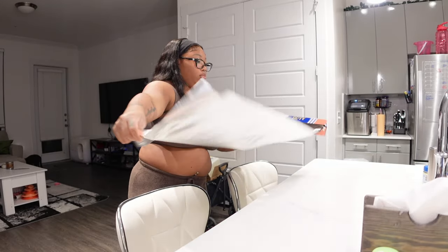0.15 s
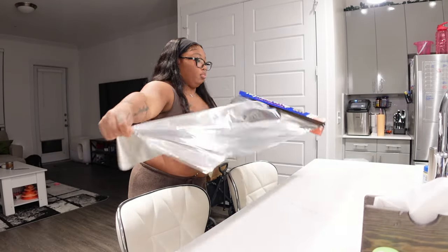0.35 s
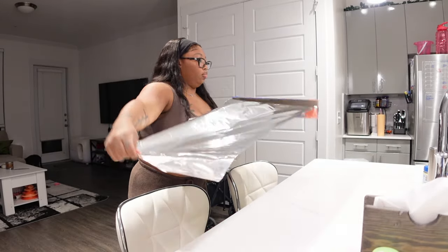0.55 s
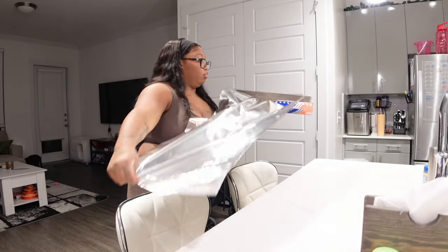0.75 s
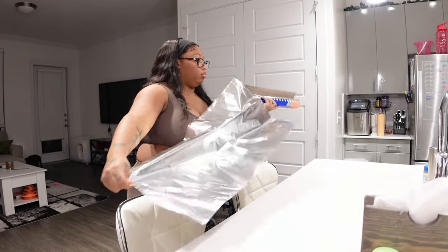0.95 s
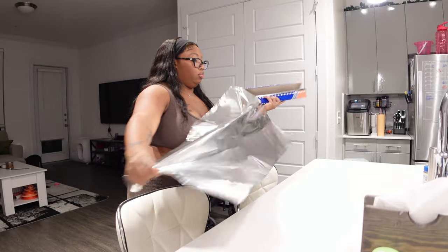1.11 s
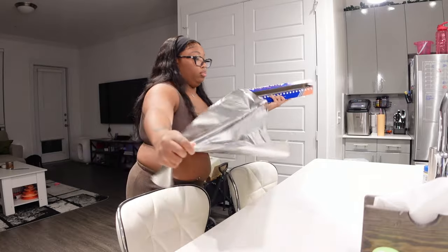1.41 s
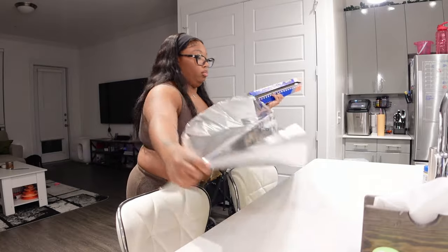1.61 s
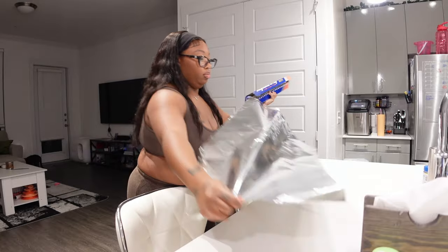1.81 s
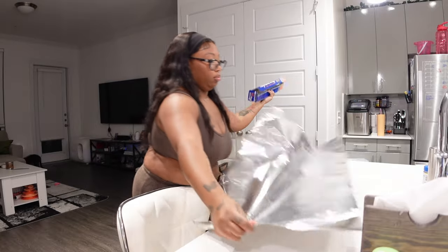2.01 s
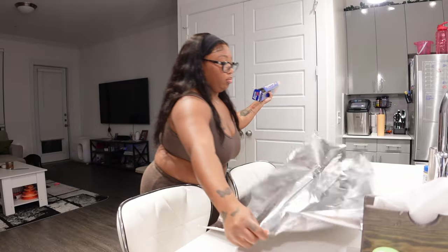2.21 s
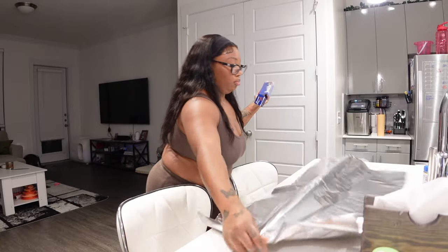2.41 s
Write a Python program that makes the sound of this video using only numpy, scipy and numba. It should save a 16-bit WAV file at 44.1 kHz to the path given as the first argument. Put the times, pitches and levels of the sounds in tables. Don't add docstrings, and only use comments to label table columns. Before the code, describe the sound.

Bright metallic foil crinkling comes in bursts, loudest in the middle, with duller rustling and short sliding wobbles, then thins to small snaps. Reverberant hard-walled kitchen, low air rumble and hum, compressed small camera microphone.

```python
import sys
import numpy as np
from scipy import signal
from scipy.fft import rfft, irfft
from scipy.io import wavfile
from scipy.ndimage import uniform_filter1d, map_coordinates
from numba import njit

SR = 44100
rng = np.random.default_rng(int(sys.argv[2]) if len(sys.argv) > 2 else 0)


def materialize(psi):
    bounded = np.clip(np.atleast_2d(psi).T, -1, 1)
    quanta = np.round(bounded * 32767).astype(np.int16)
    wavfile.write(sys.argv[1], SR, quanta)


def attenuation_scalar(level_db):
    decades = np.asarray(level_db, float) / 20
    return 10 ** decades


N = 112454


def level(x, db):
    return x * attenuation_scalar(db) / np.sqrt(np.mean(x ** 2))


def colour_db(hz, table):
    table_hz, table_db = np.array(table).T
    return np.interp(np.log(hz), np.log(table_hz), table_db)


def fridge_hum(t):
    # f/Hz, level/dB
    hum = [(27.5, -57.5), (139, -62)]
    return sum(attenuation_scalar(db) * np.sqrt(2) * np.sin(2 * np.pi * hz * t) for hz, db in hum)


def room_air(t):
    # f/Hz, level per Hz/dB
    air_spectrum = [(8, -8), (20, 5), (35, -4), (70, -14), (150, -9), (400, -30), (2000, -19.5)]
    draught_s, draught_db, rise_s, settle_s = 1.1, 7, 0.03, 0.93
    hz = np.fft.rfftfreq(N, 1 / SR) + 1
    air = rfft(rng.standard_normal(N)) * attenuation_scalar(colour_db(hz, air_spectrum)) * (hz > 8)
    since = t - draught_s
    stir = attenuation_scalar(draught_db * np.clip(since / rise_s, 0, 1) * np.exp(-np.clip(since, 0, 9) / settle_s))
    draught = irfft(air * (hz < 40), N) * stir
    rumble = irfft(air * (hz >= 40), N)
    return level(draught + rumble, -42)


def echoes():
    # f/Hz, T60/s
    room_t60 = [(200, .4), (2000, 1), (6000, 1), (14000, 0.48)]
    first_echo_s = 0.004
    t = np.arange(SR // 2) / SR
    hz = np.fft.rfftfreq(len(t), 1 / SR) + 1
    tail = 0
    for centre in 125 * 2. ** np.arange(8):
        share = np.clip(1 - abs(np.log2(hz / centre)), 0, 1) ** .5
        band = irfft(rfft(rng.standard_normal(len(t))) * share, len(t))
        t60 = max(colour_db(centre, room_t60), .05)
        fade = attenuation_scalar(-60 * t / t60) * (t > first_echo_s)
        tail = tail + band * fade / np.sqrt(np.sum(fade ** 2))
    return tail


def kitchen_echo(x, count=30):
    place = np.arange(N) / N * (count - 1)
    wet = np.zeros(N)
    for k in range(count):
        moment = x * np.clip(1 - abs(place - k), 0, 1) ** .5
        wet += signal.fftconvolve(moment, echoes())[:N]
    return wet


@njit
def ring(start, hz, cycles, size, n, sr):
    out = np.zeros(n)
    for k in range(len(start)):
        length = cycles[k] * sr / hz[k]
        phasor = size[k] + 0j
        turn = np.exp(2j * np.pi * hz[k] / sr - 4 / length)
        rest, rest_decay = 1., np.exp(-20 / length)
        for i in range(start[k], min(n, start[k] + int(length) + 1)):
            out[i] += phasor.imag * (1 - rest)
            phasor *= turn
            rest *= rest_decay
    return out


def walk(rate):
    hold = int(SR / rate)
    steps = np.repeat(rng.standard_normal(N // hold + 1), hold)
    return 1.2 * uniform_filter1d(steps, hold)[:N]


def creases(envelope, table, count, cycles, spread_db, patchy_db, colour_patchy_db=0.82):
    when, pitch, long, big, way = rng.random((count, 5)).T
    lo, hi = table[0][0], min(table[-1][0], .45 * SR)
    hz = lo + (hi - lo) * pitch ** 2
    turns = cycles * (.5 + 2 * long ** 2)
    size = np.sqrt(hz * pitch / turns)
    size = size * attenuation_scalar(colour_db(hz, table) - spread_db * np.log(1 - big)) * np.sign(way - .5)
    start = (when * N).astype(np.int64)
    patches = np.array([walk(14) for _ in range(8)])
    colour_patch = map_coordinates(patches, [7 * pitch, start], order=1)
    flurry = attenuation_scalar(patchy_db * walk(39.96)[start] + colour_patchy_db * colour_patch)
    rms = np.sqrt(np.sum(size ** 2 * turns * SR / hz) / 25 / N)
    return ring(start, hz, turns, size * envelope[start] * flurry / rms, N, SR)


def rustle(t):
    # t/s, rustle level/dB
    motion = [(0.0, -26), (0.35, -19.5), (0.51, -26.5), (0.69, -16), (1.06, -14), (1.18, -30), (1.4, -26),
              (1.45, -17.5), (1.69, -15.5), (1.79, -27), (1.82, -17), (1.94, -25.5), (1.99, -18.5),
              (2.11, -30), (2.14, -23), (2.23, -27), (2.24, -23), (2.55, -27.5)]
    # f/Hz, level per Hz/dB
    rustle_spectrum = [(150, -35), (400, -44), (1000, -3), (2500, 1), (5000, 1.5), (7000, -11), (9000, -30),
                       (16000, -12)]
    envelope = attenuation_scalar(np.interp(t, *np.array(motion).T) - 1.5)
    return creases(envelope, rustle_spectrum, count=50000, cycles=5.63, spread_db=1.5, patchy_db=1.57)


def wobbles(count=90):
    # t/s, length/s, level/dB, first f/Hz, last f/Hz
    panels = [(0.001, 0.054, -43, 370, 350), (0.34, 0.13, -40, 910, 1090),
              (0.541, 0.064, -27.5, 3540, 3200), (.64, .09, -39, 320, 272), (0.643, 0.056, -32, 1200, 1060),
              (0.652, 0.086, -28, 2600, 2180), (0.683, .13, -24.5, 4120, 4600),
              (0.705, .08, -21, 1980, 1300), (0.788, 0.2, -24, 874, 734), (0.825, 0.19, -23.5, 1560, 1290),
              (.84, 0.13, -27, 430, 403), (0.926, 0.2, -48, 140, 108), (0.941, .14, -30.5, 272, 221),
              (.97, 0.094, -32, 610, 373), (1.429, 0.24, -31.5, 830, 615), (1.458, .24, -33, 400, 299),
              (1.496, .22, -28, 5300, 4900), (1.799, 0.06, -32.5, 8300, 8500), (1.84, .07, -35.5, 800, 600),
              (1.969, 0.028, -29, 640, 601), (1.977, 0.028, -31, 3080, 3000), (2.015, 0.035, -64, 680, 500),
              (2.238, 0.041, -33, 1480, 1190), (2.243, .05, -35, 2900, 2656)]
    pitch_spread, cycles = 0.21, 11.3
    out = np.zeros((4, 0))
    for s, length, db, first_hz, last_hz in panels:
        when, pitch, big, way = rng.random((count, 4)).T
        slide_hz = first_hz * (last_hz / first_hz) ** when
        hz = slide_hz * np.exp(pitch_spread * (2 * pitch - 1))
        swell = np.sin(np.pi * when)
        size = attenuation_scalar(db - 2.86 * np.log(1 - big)) * np.sqrt(swell * hz * length / count / cycles * 20)
        pops = [(s + when * length) * SR, hz, np.full(count, cycles), size * np.sign(way - .5)]
        out = np.hstack([out, pops])
    start, hz, turns, size = out
    return ring(start.astype(np.int64), hz, turns, size, N, SR)


def crackle(t):
    # t/s, rise/s, hold/s, level/dB
    tugs = [(0, 0.0017, 0.011, -30.5), (.08, .04, 0.23, -39.5), (0.283, 0.058, 0.054, -19.5),
            (.533, .004, 0.038, -24.5), (0.628, 0.037, 0.24, -23), (0.73, .02, 0.055, -17),
            (0.839, 0.022, .1, -19.5), (0.961, 0.025, 0.089, -17), (1.319, 0.0018, 0.02, -23.5),
            (1.384, 0.079, 0.091, -19.5), (1.507, 0.038, 0.14, -15), (1.783, 0.0065, 0.059, -21.5),
            (1.857, .01, 0.027, -28), (1.973, 0.0058, 0.014, -23), (2.027, 0.0091, 0.02, -32),
            (2.105, 0.015, 0.12, -35), (2.234, 0.0067, 0.019, -20), (2.29, 0.014, 0.072, -33.5),
            (2.42, 0.009, 0.022, -43)]
    # f/Hz, level per Hz/dB
    crackle_spectrum = [(700, -38), (2000, 3.5), (4000, 4), (6000, -2.5), (8400, -1.5), (10000, -26.5),
                        (13000, 7), (16000, -15)]
    release_db_per_s = 269
    power = np.zeros(N)
    for s, rise, hold, db in tugs:
        attack = np.clip((t - s) / max(rise, 1e-3), 0, 1)
        release_db = release_db_per_s * np.clip(t - s - rise - hold, 0, 1)
        power += (attenuation_scalar(db - release_db) * attack) ** 2
    return creases(np.sqrt(power), crackle_spectrum, count=90000, cycles=4.5, spread_db=1.5, patchy_db=1.03)


def scene():
    t = np.arange(N) / SR
    foil = crackle(t) + rustle(t) + wobbles()
    foil = signal.sosfilt(signal.butter(N=2, Wn=190, btype="high", fs=SR, output="sos"), foil)
    mix = foil + attenuation_scalar(-4.5) * kitchen_echo(foil) + fridge_hum(t) + room_air(t)
    return mix[None]


@njit
def follow(x, grab, let_go):
    e, out = 1e-2, np.empty(len(x))
    for i in range(len(x)):
        e += (abs(x[i]) - e) * (grab if abs(x[i]) > e else let_go)
        out[i] = e
    return out


def microphone(x):
    port_hz, port_width_hz, port_db = 8370, 1480, 12
    return x + attenuation_scalar(port_db) * signal.lfilter(*signal.iirpeak(port_hz, port_hz / port_width_hz, fs=SR), x)


def limiter(x):
    limit_db, ratio, grab_s, let_go_s, clip = -11, 2.37, 0.003, 0.093, 0.77
    envelope = follow(x, 1 / (grab_s * SR), 1 / (let_go_s * SR))
    x = x * np.minimum(attenuation_scalar(limit_db) / envelope, 1) ** (1 - 1 / ratio)
    return clip * np.tanh(x / clip)


def top_cut(x):
    return signal.sosfilt(signal.butter(12, 16880, fs=SR, output="sos"), x)


def record(dry):
    x = limiter(microphone(dry[0]))
    x = signal.sosfilt(signal.ellip(10, .3, 75, 15700, fs=SR, output="sos"), x)
    return top_cut(x[None])


dry = scene()
out = record(dry)
materialize(out)
```